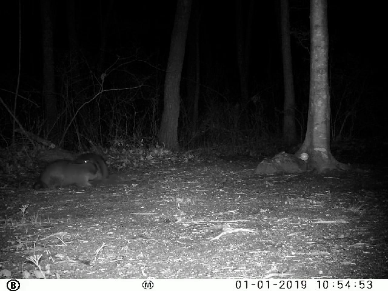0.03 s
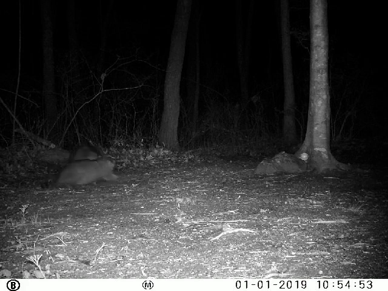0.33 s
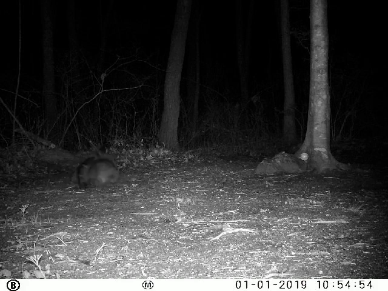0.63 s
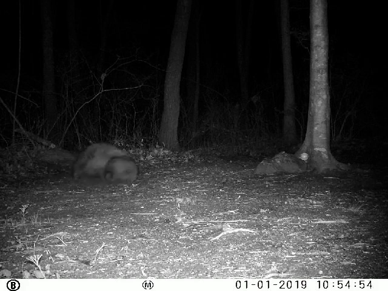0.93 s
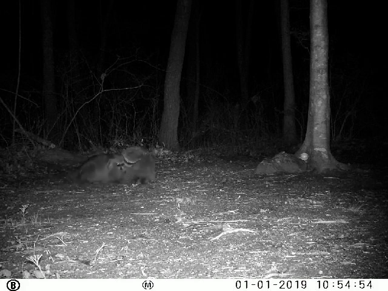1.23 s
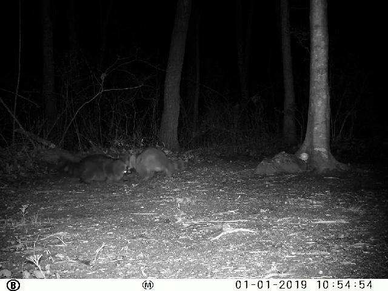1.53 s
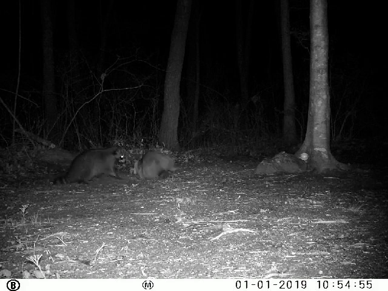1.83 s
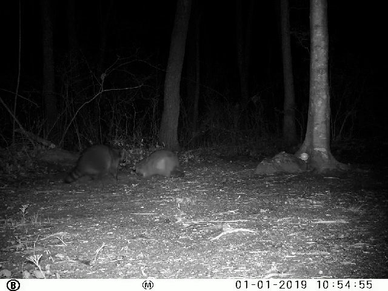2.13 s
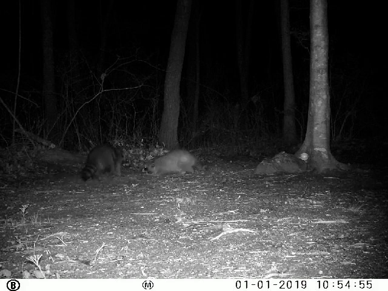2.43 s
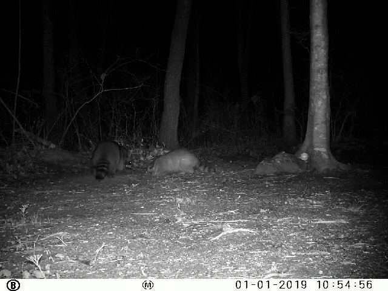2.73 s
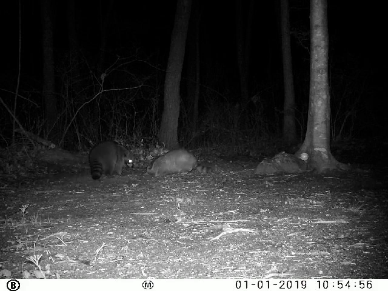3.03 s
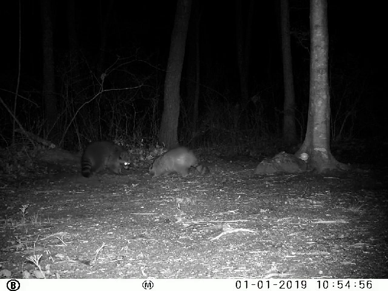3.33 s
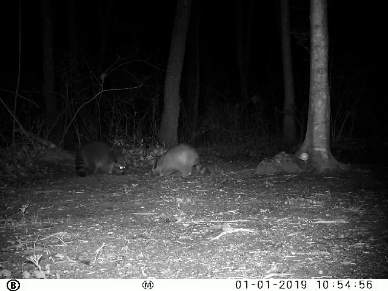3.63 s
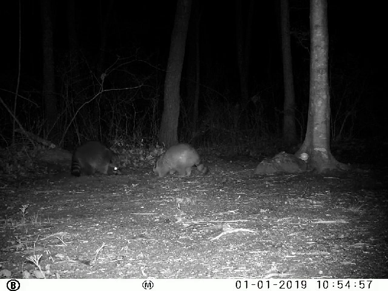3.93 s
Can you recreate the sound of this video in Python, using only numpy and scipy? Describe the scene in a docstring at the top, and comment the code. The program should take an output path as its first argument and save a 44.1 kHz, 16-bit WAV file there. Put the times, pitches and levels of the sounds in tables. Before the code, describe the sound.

Rattling raccoon snarls and leaf scuffling sink to a low growl in a quiet forest.

```python
"""In a forest at night, two raccoons fight in dry leaves some way from a trail camera.
Rattling snarls burst out as they grapple, then sink to a slow, low growl as they part.
Their loose vocal folds slap and puff air, making mouth and chest ring; leaves crackle underfoot.
Small frogs peep among the echoing trees, over faint chirps and a distant low drone."""
import sys
import numpy as np
from scipy import signal
from scipy.io import wavfile
from scipy.ndimage import uniform_filter1d

SR = 44100
rng = np.random.default_rng(int(sys.argv[2]) if len(sys.argv) > 2 else 0)


def digitize_waveform(pressure):
    """Quantize a signal to 16-bit integers and store it at the path in sys.argv[1].

    Rows of a 2-D input are taken as channels; values are limited to [-1, 1].
    """
    field = np.atleast_2d(pressure).T
    bounded = np.clip(field, -1, 1)
    quanta = np.round(bounded * 32767).astype(np.int16)
    wavfile.write(sys.argv[1], SR, quanta)


N = 176400
T = np.arange(N) / SR


def amp(db):
    """Turns decibels into a number to multiply by."""
    return 10 ** (np.asarray(db) / 20)


def unit(x):
    """Scales a sound to an average strength (rms) of 1."""
    return x / np.sqrt(np.mean(x ** 2) + 1e-20)


def curve(rows, t, column=1):
    """Reads a table column at times t, joining its points with straight lines."""
    rows = np.array(rows)
    return np.interp(t, rows[:, 0], rows[:, column])


def swell(t, peak_s, half_s, db):
    """A smooth, bell-shaped rise and fall in loudness."""
    return amp(db) * np.exp(-((t - peak_s) / half_s) ** 2 / 2)


def add(mix, start_s, sound):
    """Mixes a sound in at the given time."""
    part = mix[max(round(start_s * SR), 0):][:len(sound)]
    part += sound[:len(part)]


def colour(x, points):
    """Gives a sound its tone colour: how strong its low and high parts are. Comes out at strength 1."""
    hz, db = np.transpose(points)
    f = abs(np.fft.fftfreq(8192, 1 / SR))
    log_gain = np.log(amp(np.interp(np.log(f + 1), np.log(hz), db)))
    response = np.exp(np.conj(signal.hilbert(log_gain)))  # rings after a tap, never before
    taps = np.fft.ifft(response).real[:len(f) // 2]
    return unit(signal.fftconvolve(x, taps)[:len(x)])


def resonate(x, hz, width_hz):
    """Makes a sound ring around hz, which may be steady or moving."""
    turn = np.exp(2j * np.pi * np.cumsum(hz * np.ones(len(x))) / SR)
    r = np.exp(-np.pi * width_hz / SR)
    ring = signal.lfilter([(1 - r) ** 2], [1, -2 * r, r * r], x / turn + 1e-18)
    return unit((turn * ring).real)


def patchy(x, spread_db=3.5):
    """Keeps the tone colour shifting, in small random patches of time and pitch."""
    spectrum = signal.stft(x, nperseg=512)[2]
    patches = uniform_filter1d(rng.standard_normal(spectrum.shape[::-1]), size=6, axis=0)
    patches = unit(uniform_filter1d(patches, size=4, axis=1).T)
    return unit(signal.istft(spectrum * amp(spread_db * patches), nperseg=512)[1][:len(x)])


def trees(x, fade_s, echoes_per_s=2000):
    """Scattered echoes from the trunks, dying away by 60 dB in fade_s."""
    t = T[:SR]
    echoes = rng.standard_normal(SR) * (rng.random(SR) < echoes_per_s / SR)
    echoes *= amp(-60 * t / fade_s) * (t > .008)
    return signal.fftconvolve(x, echoes / np.linalg.norm(echoes))[:N]


# Tone colours of the night air and the rumble: f/Hz, level/dB
AIR_COLOUR = [(20, 6), (100, 11), (170, 10.5), (300, -2), (500, -6), (1000, -13), (2000, -20),
              (3200, -28.5), (4200, -37), (5200, -42.5), (6800, -31.5), (8000, -36.5), (9000, -38.5)]
RUMBLE_COLOUR = [(10, -17), (22, -9), (36, 10.5), (50, 2.5), (70, -4), (110, -8), (160, -15.5), (400, -49),
                 (2000, -100)]
# How the rumble rises and falls, and how the whole background fades in on top of that: t/s, level/dB
RUMBLE_LEVEL = [(.3, -64.5), (.8, -55), (1.45, -52.5), (2.0, -55.5), (2.6, -55), (3.1, -50.5), (3.6, -56),
                (4.0, -53.5)]
FADE_IN = [(.31, -13), (.4, -13), (.45, -6), (.7, -1), (1.0, 0)]
def night():
    """Soft air, a low rumble and a wavering drone that slowly grows, like far traffic."""
    air = amp(-59.5) * colour(rng.standard_normal(N), AIR_COLOUR)
    rumble = amp(curve(RUMBLE_LEVEL, T)) * colour(rng.standard_normal(N), RUMBLE_COLOUR)
    drone = amp(-58) * resonate(rng.standard_normal(N), hz=84.8, width_hz=15.6)
    drone += amp(-57.5) * resonate(rng.standard_normal(N), hz=100.15, width_hz=7.7)
    drone *= amp(2.3 * (T - T.mean()))  # 2.3 dB louder each second
    return (air + rumble + drone) * amp(curve(FADE_IN, T))


# Chirps: t/s, half length/s, level/dB, f/Hz
FAR_CHIRPS = [(2.726, 0.053, -87.5, 4340), (3.767, .05, -91.5, 4200)]
def far_chirps():
    """Faint, blurred chirps from deep in the forest, each a short swell of high noise."""
    return sum(swell(T, s, half_s, db) * resonate(rng.standard_normal(N), hz, width_hz=550)
               for s, half_s, db, hz in FAR_CHIRPS)


# Frog calls: t/s, level/dB, f/Hz (the pitch each one climbs towards)
PEEPS = [(2.459, -74, 3262), (3.459, -75, 3263)]
def frogs(length_s=.22, rise=.083, glide_s=.06):
    """Rising, slightly rough whistles, far off and blurred by the forest."""
    calls, t = np.zeros(N), np.arange(0, length_s, 1 / SR)
    for s, db, top_hz in PEEPS:
        wobble = unit(uniform_filter1d(rng.standard_normal(N), size=120))[:len(t)]
        hz = top_hz * (1 - rise * np.exp(-t / glide_s) + .04 * t / length_s * wobble)
        whistle = np.sin(2 * np.pi * np.cumsum(hz) / SR)
        add(calls, s, amp(db) * np.sin(np.pi * t / length_s) * whistle)
    return calls + amp(2) * trees(calls, fade_s=1.3)


# How the scuffling rises and falls: t/s, level/dB (raised a little below)
SCUFFLE = [(0.38, -105), (0.43, -80.5), (0.63, -67.5), (0.65, -78.5), (0.87, -91.5), (1.01, -71.5),
           (1.04, -61), (1.29, -62.5), (1.39, -102.5), (1.42, -75), (1.51, -82), (1.55, -91.5), (1.56, -65),
           (1.58, -60), (1.82, -67.5), (1.85, -80.5), (1.96, -66), (2.07, -78), (2.12, -62.5), (2.17, -63),
           (2.39, -83), (2.46, -85.5), (2.55, -94), (2.66, -85), (2.81, -90), (2.85, -76)]
# Light steps as the animals part: t/s, half length/s, level/dB
STEPS = [(2.666, .015, -92), (2.905, 0.036, -78), (3.244, .02, -91.5), (3.458, 0.018, -91),
         (3.657, .012, -87), (3.853, 0.0084, -88)]
# Tone colour of dry leaves: f/Hz, level/dB
LEAF_COLOUR = [(200, -4.5), (1000, 4.5), (2500, 4), (3400, 2.5), (4200, -5), (5000, 0), (6000, 4.5),
               (7300, 0.5), (8200, -3.5), (9000, -8.5)]
def leaves(crackles_per_s=2500, spread_db=9.5):
    """Dry leaves give off many tiny crackles under bodies and paws."""
    sizes = amp(spread_db * np.minimum(rng.exponential(1, N), 4))
    crackles = sizes * rng.choice([-1, 1], N) * (rng.random(N) < crackles_per_s / SR)
    rustle = colour(unit(crackles) + .99 * rng.standard_normal(N), LEAF_COLOUR)
    fade_out = np.clip((SCUFFLE[-1][0] - T) / .05, 0, 1)
    scuffle = amp(curve(SCUFFLE, T) + 2.3) * fade_out
    steps = sum(swell(T, *step) for step in STEPS)
    return (scuffle + steps) * patchy(rustle)


def vocal_folds(t, per_s, uneven, air, spread_db, puff_s=.004):
    """Loose folds in the throat slap together unevenly; a puff of air follows each slap."""
    gaps, sizes = rng.standard_normal((256, 2)).T
    at = (np.cumsum(np.exp(uneven * gaps)) * SR / per_s).astype(int)
    inside = at < len(t)
    slaps = np.zeros(len(t))
    slaps[at[inside]] = amp(spread_db * np.clip(sizes, -2, 1.5))[inside]
    puffs = signal.lfilter([1], [1, -np.exp(-1 / (puff_s * SR))], slaps)
    breath = (1 + puffs) * rng.standard_normal(N)[:len(t)]  # air also flows between puffs
    return np.sqrt(1 - air) * unit(slaps - slaps.mean()) + np.sqrt(air) * unit(breath)


# Loudness of the last growl: t/s, level/dB
GROWL_LEVEL = [(3.004, -71), (3.03, -55.5), (3.15, -60.5), (3.28, -58), (3.36, -65), (3.44, -64),
               (3.5, -75.5), (3.7, -65.5), (4.0, -81)]
# Its tone colour: f/Hz, level/dB
GROWL_COLOUR = [(50, -15.5), (120, 6), (250, 3), (450, -4), (700, -10.5), (1150, -12), (2000, -28),
                (3500, -49.5), (5000, -51.5), (8000, -48.5)]
def growl():
    """Slow, even slaps of the folds behind a closed mouth. Gives start time and sound."""
    t = np.arange(GROWL_LEVEL[0][0], N / SR, 1 / SR)
    pulses = vocal_folds(t, per_s=44, uneven=.02, air=.37, spread_db=3.5)
    return t[0], amp(curve(GROWL_LEVEL, t)) * colour(pulses, GROWL_COLOUR)


# Single hard catches in the throat: t/s, level/dB, f/Hz
CATCHES = [(0.721, -47.5, 1250), (1.109, -38, 1400), (1.171, -35, 1500), (1.218, -34, 1040),
           (1.251, -40, 1680), (1.284, -32, 1595), (1.305, -38.5, 1220), (1.577, -36.5, 1400),
           (1.6, -42.5, 1470), (1.631, -35, 1245), (1.818, -39.5, 980), (2.139, -47, 1180),
           (2.169, -47, 1230), (2.602, -53.5, 1050), (2.656, -52.5, 980), (2.706, -53, 1000),
           (2.745, -46, 950), (2.763, -56, 1090), (2.791, -58, 950), (2.808, -60, 990), (3.209, -57, 900),
           (3.254, -60, 990), (3.847, -58.5, 750)]
def throat_catch(peak_s, db, hz, rise_s=.0009):
    """One hard slap of the folds makes the mouth ring briefly. Gives start time and sound."""
    t = T[:SR // 80]
    grit = .33 * resonate(rng.standard_normal(len(t)), hz, width_hz=1000)
    loudness = amp(db) * t / rise_s * np.exp(1 - t / rise_s)
    return peak_s - rise_s, loudness * (np.sin(2 * np.pi * hz * t) + grit)


# Tone colours of the throat, the chest and the rasp of open jaws: f/Hz, level/dB
THROAT_COLOUR = [(150, -32), (400, -7.5), (600, 4.5), (1000, 1.5), (1500, 1), (1900, -0.5), (2400, -7.5),
                 (3200, -2), (4200, -17.5), (8000, -30.5)]
CHEST_COLOUR = [(60, -32), (120, -6), (170, 6), (240, -3), (340, -1), (480, -4.5), (600, -10.5),
                (750, -35.5), (1500, -38), (4000, -71)]
RASP_COLOUR = [(500, -42), (1500, -21), (2200, 4.5), (2700, 7), (3300, 3), (4100, -9), (4900, -12),
               (5700, -13), (6500, -27), (8500, -23.5)]
# Moments when the jaws open wide and rasp: t/s, half length/s, level/dB
OPEN_JAWS = [(0.56, 0.063, -68.5), (.8, 0.24, -77.5), (1.04, 0.024, -61), (1.206, 0.061, -53.5),
             (1.474, 0.044, -68.5), (1.609, 0.017, -54), (2.15, 0.022, -73)]
# The shape of each snarl: t/s, throat level/dB, mouth f/Hz, chest level/dB (lowered a little below)
WARNING = [(0.42, -75, 1140, -65), (0.564, -57, 1410, -57), (0.6, -61.5, 1425, -55.5),
           (0.66, -58, 1210, -54), (0.716, -50, 1226, -46), (0.754, -59, 1160, -49.5),
           (0.796, -62, 930, -55), (0.95, -64.5, 940, -55)]
GRAPPLE = [(0.95, -63, 1000, -50), (1.028, -49, 1475, -46.5), (1.07, -49, 1566, -41.5),
           (1.158, -44, 1380, -50.5), (1.224, -46.5, 1070, -43.5), (1.268, -49.5, 1450, -49),
           (1.332, -50.5, 1286, -49), (1.38, -75, 1150, -53)]
GRUNT = [(1.38, -74, 1230, -66.5), (1.446, -60, 814, -56), (1.502, -57, 904, -56), (1.55, -78, 860, -67)]
LUNGE = [(1.55, -76, 1400, -60), (1.58, -43.5, 1450, -47.5), (1.614, -45, 1420, -40.5),
         (1.644, -53.5, 1260, -45), (1.692, -55, 1220, -48.5), (1.784, -51.5, 1230, -45.5),
         (1.824, -54, 1050, -55), (1.84, -86, 1010, -51)]
THREAT = [(1.84, -72, 1120, -58), (1.874, -59, 1010, -56.5), (1.944, -51, 1060, -53),
          (1.962, -62.5, 1080, -58), (1.972, -52, 1087, -58), (2.07, -68.5, 980, -53)]
RETORT = [(2.07, -66.5, 1040, -52.5), (2.142, -40.5, 1240, -40), (2.15, -44, 1240, -41),
          (2.178, -43, 1316, -46.5), (2.202, -66.5, 1250, -50.5), (2.26, -57, 1150, -47),
          (2.3, -72.5, 1070, -54)]
GRUMBLE = [(2.3, -59.5, 1050, -54), (2.376, -64.5, 1100, -57.5), (2.426, -61, 1050, -54.5),
           (2.532, -67, 934, -56), (2.576, -72, 1080, -68.5), (2.7, -70, 940, -53)]
WHINE = [(2.68, -74.5, 950, -63), (2.75, -62, 900, -54), (2.78, -70, 944, -62), (2.8, -61, 1004, -63),
         (2.835, -74, 970, -73)]
HUFF = [(2.84, -79, 958, -65), (2.86, -77.5, 984, -65.5), (2.88, -62, 960, -56), (2.896, -63, 900, -57),
        (3.0, -89.5, 980, -74.5)]
# The voice of each snarl: shape, slap rate/Hz, unevenness, share of air (0-1), slap level spread/dB,
# mouth ring width/Hz, chest f/Hz, hiss f/Hz, hiss level/dB (compared with the throat)
SNARLS = [(WARNING, 105, .2, 0.76, 1.8, 570, 310, 5500, -35.5),
          (GRAPPLE, 100, .22, 0.8, 2, 940, 308, 5760, -28.5),
          (GRUNT, 120, .25, 0.86, 2.4, 930, 310, 5800, -18),
          (LUNGE, 130, 0.2, 0.69, 1.9, 810, 274, 6380, -21),
          (THREAT, 150, 0.2, 0.99, 1.8, 1030, 293, 6800, -20.5),
          (RETORT, 105, .22, 0.75, 2.1, 630, 200, 7760, -28),
          (GRUMBLE, 47, 0.074, 0.7, 3.3, 920, 245, 7030, -23.5),
          (WHINE, 60, .15, 0.91, 1.8, 310, 214, 6900, -34),
          (HUFF, 120, 0.27, .85, 1.8, 740, 250, 7400, -23.5)]
def snarl(shape, per_s, uneven, air, spread_db, width_hz, chest_hz, hiss_hz, hiss_db):
    """The folds make the moving mouth and the chest ring; the teeth hiss. Gives start time and sound."""
    t = np.arange(shape[0][0] - .01, shape[-1][0] + .008, 1 / SR)
    throat_db, mouth_hz, chest_db = (curve(shape, t, column) for column in (1, 2, 3))
    pulses = vocal_folds(t, per_s, uneven, air, spread_db)
    mouth = resonate(pulses, mouth_hz, width_hz)
    mouth += amp(-15) * resonate(pulses, 1.47 * mouth_hz, width_hz=320)  # a weaker, higher ring
    throat = amp(throat_db) * colour(mouth, THROAT_COLOUR)
    body = colour(pulses, CHEST_COLOUR)
    chest = amp(chest_db - 2) * unit(body + .45 * resonate(body, chest_hz, width_hz=203))
    rasp = sum(swell(t, *gape) for gape in OPEN_JAWS) * patchy(colour(pulses, RASP_COLOUR))
    hiss = amp(throat_db + hiss_db) * resonate(pulses, hiss_hz, width_hz=650)
    soft_ends = np.clip(np.minimum(t - t[0], t[-1] - t) / .015, 0, 1)
    return t[0], (throat + chest + rasp + hiss) * soft_ends


def scene():
    """The fight and its echoes, with the frogs and the night behind it, in one channel."""
    fight = leaves()
    for row in SNARLS:
        add(fight, *snarl(*row))
    for row in CATCHES:
        add(fight, *throat_catch(*row))
    add(fight, *growl())
    echoes = amp(-11.5) * trees(fight, fade_s=.36)
    return (fight + echoes + frogs() + far_chirps() + night())[None]


def record(dry, start_s=.312, soft_hz=8350, edge_hz=8850):
    """Silence until the camera switches on; it cuts away the highest sounds."""
    switch_on = np.clip((T - start_s) * 500, 0, 1)
    gentle_cut = signal.firwin(71, soft_hz, fs=SR)
    steep_cut = signal.firwin(301, edge_hz, window=("kaiser", 8), fs=SR)
    softened = signal.oaconvolve(dry * switch_on, gentle_cut[None], "same")
    return signal.oaconvolve(softened, steep_cut[None], "same")


dry = scene()
out = record(dry)
digitize_waveform(out)
```